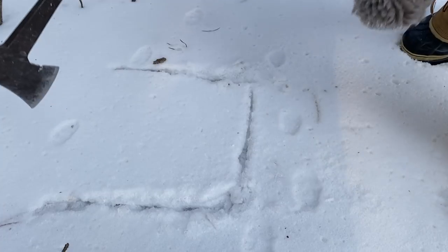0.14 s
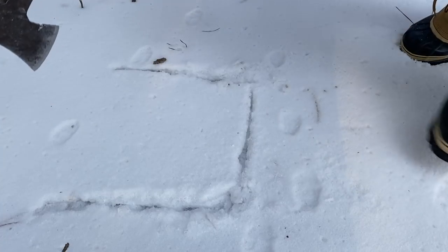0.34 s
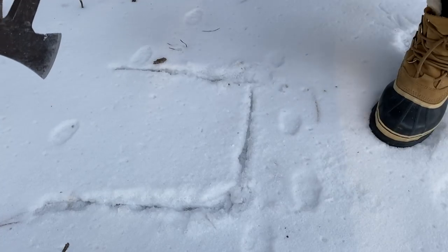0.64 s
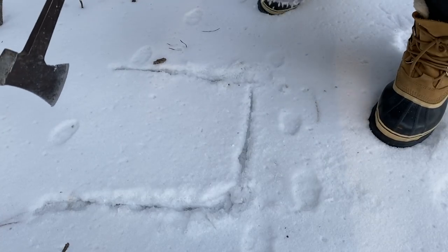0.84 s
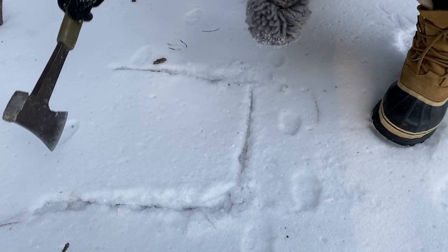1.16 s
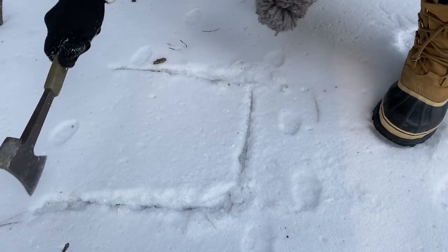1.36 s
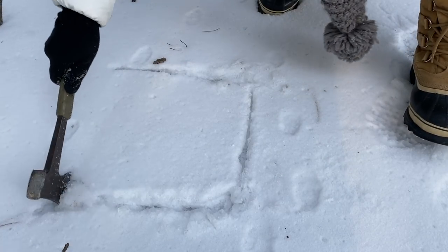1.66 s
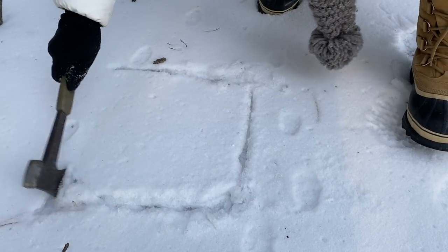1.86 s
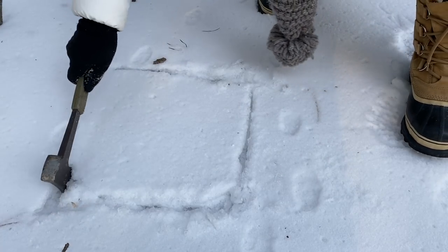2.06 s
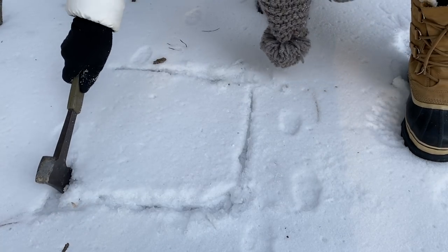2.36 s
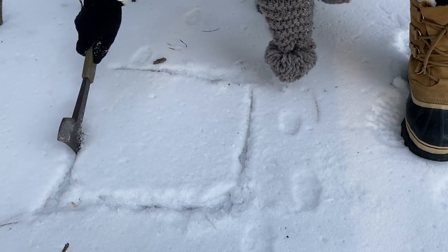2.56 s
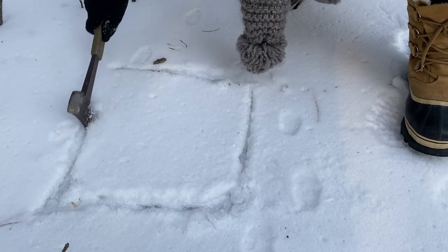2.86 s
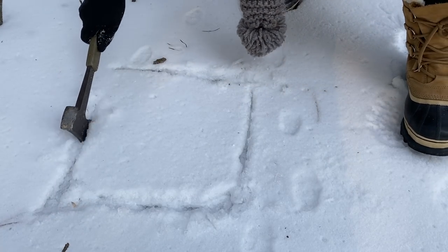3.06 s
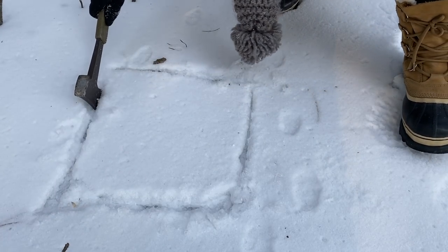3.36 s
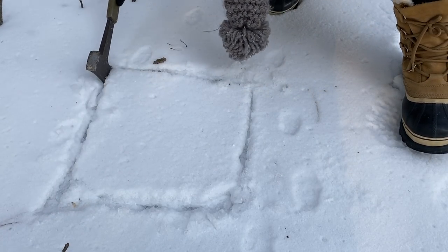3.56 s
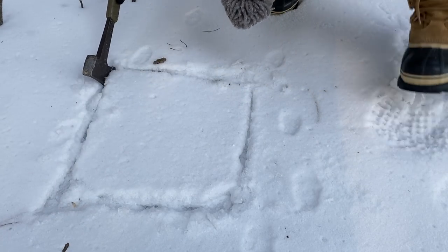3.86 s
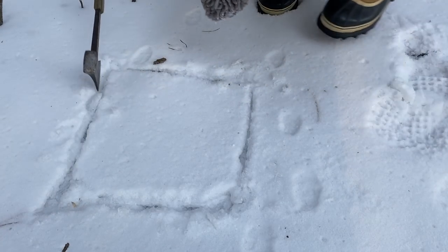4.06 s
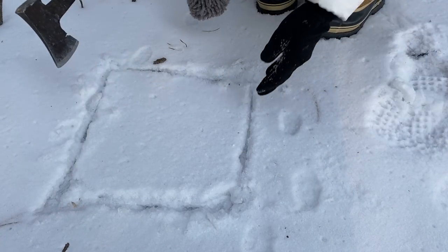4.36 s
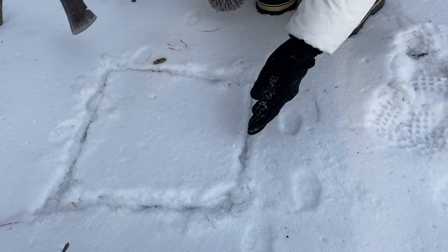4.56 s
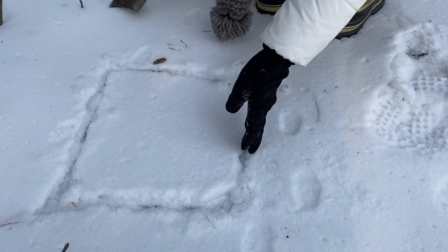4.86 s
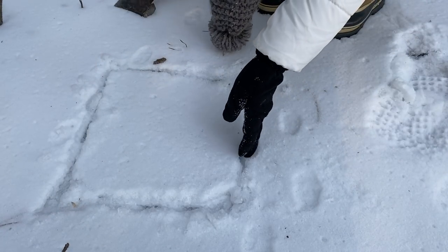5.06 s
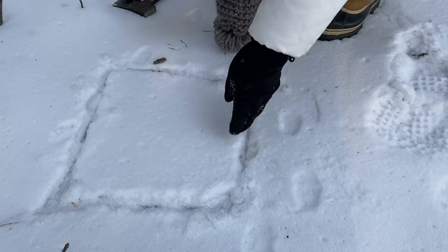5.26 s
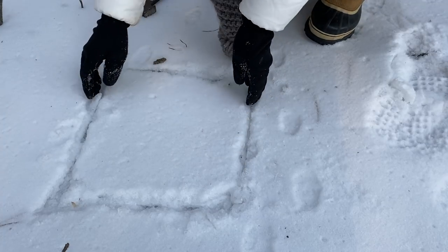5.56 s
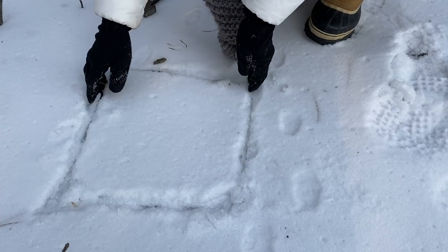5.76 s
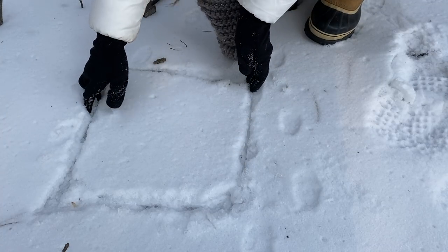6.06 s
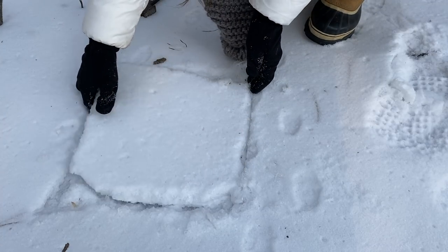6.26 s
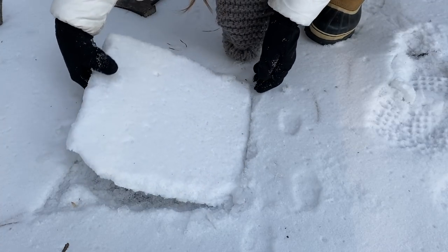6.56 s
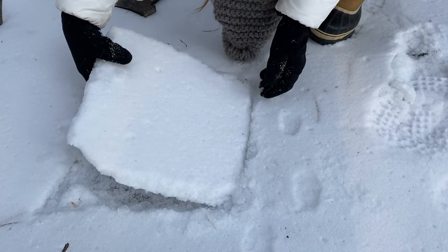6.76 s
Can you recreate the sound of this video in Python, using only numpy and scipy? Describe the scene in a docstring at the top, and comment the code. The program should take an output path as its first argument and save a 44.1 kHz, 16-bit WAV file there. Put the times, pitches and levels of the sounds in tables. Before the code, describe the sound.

A hatchet chops and saws through crusted snow with grainy crunches, sharp cracks and brief steel rings, then gloved hands slide a slab loose.

```python
"""A hatchet chops and saws crusted snow close by: ice grains crunch as dense, clustered noise clicks.
The stiff crust cracks under blade and boots: noise snaps with short, falling thumps.
Jacket cloth rubs as soft noise swells; ice rasps on the steel head and rings its damped modes.
Gloved hands prise the slab loose and slide it up, a run of grainy swells.
The still winter forest adds a faint rumble and hiss, and its trunks a very faint, dull tail."""
import sys
import numpy as np
from scipy import signal
from scipy.fft import rfft, irfft, next_fast_len
from scipy.io import wavfile
from scipy.ndimage import uniform_filter1d

SR = 44100
rng = np.random.default_rng(int(sys.argv[2]) if len(sys.argv) > 2 else 0)


def store_pcm(level_fs):
    """Save levels as 16-bit WAV."""
    pcm = np.round(np.clip(level_fs, -1, 1) * 32767).astype(np.int16)
    wavfile.write(sys.argv[1], SR, np.atleast_2d(pcm).T)


N = 305171
SIZE = next_fast_len(N + 8192)  # transform length, with room for tails
HZ = np.fft.rfftfreq(SIZE, 1 / SR)
TIME = np.arange(N) / SR


def gain_of(db):
    """Decibels to amplitude."""
    return 10 ** (np.asarray(db) / 20)


def evened(x):
    """Scales to rms 1."""
    return x / np.sqrt(np.mean(abs(x) ** 2) + 1e-20)


def blow(x):
    """Scales a short sound to the energy of 10 ms at rms 1."""
    return x * np.sqrt(SR / 100 / np.sum(x ** 2))


def read(points, hz):
    """Reads a table on a log-frequency axis."""
    f, value = np.transpose(points)
    return np.interp(np.log(hz + 1), np.log(f), value)


def add(mix, s, sound):
    """Adds a sound to the mix at time s."""
    part = mix[..., max(round(s * SR), 0):][..., :sound.shape[-1]]
    part += sound[..., :part.shape[-1]]


def filtered(x, response):
    """Applies a frequency response."""
    return irfft(rfft(x, SIZE) * response, SIZE)[..., :N]


def colour(points):
    """Causal (minimum-phase) response of unit power with the given spectrum."""
    cepstrum = irfft(np.log(evened(gain_of(read(points, HZ)))), SIZE)
    cepstrum[1:SIZE // 2] *= 2
    cepstrum[SIZE // 2 + 1:] = 0
    return np.exp(rfft(cepstrum))


def bending(hz, travel_ms):
    """Bending waves in a plate: delay goes as 1 / sqrt(Hz), travel_ms at 250 Hz, so the bass comes last."""
    return np.exp(-4j * np.pi * travel_ms / 1000 * np.sqrt(250 * hz))


# scatter of grains between left and right: (frequency [Hz], side level [dB])
SIDE_SCATTER = [(60, -8), (150, -11.5), (280, -8), (600, -3), (1500, -10.5), (3000, -13.5), (6000, -4.5),
                (9000, -20), (16000, -6)]


def scattered(clicks):
    """Gives each click its own place between left and right."""
    side = filtered(clicks * rng.standard_normal(N), gain_of(read(SIDE_SCATTER, HZ)))
    return np.array([clicks + side, clicks - side])


def grains(per_s, spread_db):
    """Ice grains breaking: many small clicks and a few large ones."""
    size = gain_of(spread_db * np.minimum(rng.exponential(1, N), 4))
    sign = rng.choice([-1., 1.], N)
    breaks = rng.random(N) < per_s / SR
    return evened(size * sign * breaks)


def clumps(depth_db, width_s):
    """Grains give way in clusters, as in stick and slip: a random level drawn every width_s."""
    knots = np.arange(0, 8, width_s)
    wander = np.interp(TIME, knots, rng.standard_normal(len(knots)))
    return evened(gain_of(depth_db * wander))


def steadied(clicks, order=900):
    """Evens out the clicks by their local power: close to a large break the others are small."""
    return clicks / np.sqrt(abs(uniform_filter1d(clicks ** 2, order)) + 0.0085)


def to_left(x, lead_s, tilt_db):
    """The hatchet works on the left: its sound comes there first and stronger."""
    lag = np.exp(2j * np.pi * HZ * np.array([[0], [-lead_s]]))
    return filtered(x, lag) * gain_of([[tilt_db], [-tilt_db]])


def plates(slips, low_hz=230, high_hz=720, octaves=0.36, count=9):
    """Each slip sets off one patch of crust, which chirps at its own pitch."""
    patch = rng.integers(0, count, N)
    spectrum = 0
    for k, hz in enumerate(np.geomspace(low_hz, high_hz, count)):
        hump = evened(np.exp(-(np.log2((HZ + 1) / hz) / octaves) ** 2))
        spectrum = spectrum + rfft(slips * (patch == k), SIZE) * hump
    return irfft(spectrum * bending(HZ, travel_ms=7.077), SIZE)[:, :N]


def swells(rows, late):
    """Level of slow movements: each rises and falls in one arch; late > 1 delays its top, < 1 hastens it."""
    level = np.zeros(N)
    for s, length, level_db in rows:
        progress = np.arange(0, length, 1 / SR) / length
        add(level, s, gain_of(level_db) * np.sin(np.pi * progress ** late))
    return level


# chops, pushes of the blade and scuffs:
# (time [s], push length [s], relative crust level [dB], fizz over crust [dB])
STROKE_HITS = [(0.079, 0.0064, -39, 5), (.15, 0.064, -50, 7.5), (0.374, 0.048, -25.5, -1),
               (.57, 0.011, -50.5, 14.5), (0.74, 0.018, -34, -1), (0.749, 0.037, -17, -12.5),
               (0.796, .03, -29, -8.5), (0.867, 0.0071, -33.5, -3), (0.882, 0.021, -26, -10),
               (1.031, 0.0072, -38, -2), (1.45, 0.059, -33, -16), (1.52, .034, -26, 0.5),
               (1.816, 0.018, -24, 2.5), (1.89, 0.063, -43, -6), (2.093, 0.11, -32, -4),
               (2.423, 0.089, -30.5, -1), (2.722, 0.13, -31, 2.5), (2.939, 0.04, -50.5, -45),
               (3.112, 0.081, -30, 4.5), (3.396, 0.079, -39, 3), (3.479, 0.046, -31, -10.5),
               (3.733, 0.06, -37.5, -7), (3.876, 0.014, -31.5, -13), (3.93, 0.089, -49.5, 3),
               (4.078, 0.1, -32, -0.5), (4.258, 0.067, -33, -5), (4.318, 0.02, -30, -3),
               (4.41, .045, -38, -5), (4.487, 0.05, -39.5, -8.5), (4.849, 0.048, -37.5, -26),
               (5.118, 0.022, -28.5, -26), (5.209, .045, -36.5, -9), (5.3, 0.12, -50, 7)]
# light rubbing of the snow under boots and blade:
# (time [s], relative crust level [dB], relative fizz level [dB])
RUBBING = [(0.0, -42.5, -42.5), (0.23, -49, -73), (0.38, -64.5, -64), (1.2, -38, -54.5), (1.39, -36.5, -41),
           (1.69, -46.5, -61), (2.08, -34, -47), (2.22, -47.5, -49.5), (2.49, -49, -54), (3.02, -47, -45.5),
           (3.27, -42.5, -55), (3.74, -48.5, -56.5), (3.93, -38.5, -50), (4.18, -39, -44.5),
           (4.4, -49.5, -66.5), (4.7, -63.5, -69), (5.26, -35, -47), (5.62, -57.5, -61)]
# a long push is leaned into slowly and dies slowly; a short chop bites at once
BITE_S, LEAN_S = 0.0027, 0.53  # rise: BITE_S + length squared / LEAN_S
FALL_S, FALL_SHARE = .028, .25  # 20 dB fall, before linger scales it: fixed part and share of the length
CRUMBS_DB, CRUMBS_FALL_S = -22.5, 0.45  # loosened crumbs settle; their 20 dB fall is scaled likewise


def pressure(column, lag_s, stretch, linger, lumps, creep_db):
    """Amplitude of the crunch in the crust (column 0) or the fizz (column 1): strokes over fitful rubbing."""
    rubbing = np.transpose(RUBBING)
    rubbing_db = creep_db + np.interp(TIME, rubbing[0], rubbing[1 + column])
    power = (lumps * gain_of(rubbing_db)) ** 2
    t = np.arange(SR) / SR
    for s, length, level_db, bright_db in STROKE_HITS:
        rise = np.minimum(t / (BITE_S + length ** 2 / LEAN_S), 1)
        after = np.maximum(t - stretch * length, 0) / linger
        fall = gain_of(-20 * after / (FALL_S + FALL_SHARE * length))
        crumbs = gain_of(CRUMBS_DB - 20 * after / CRUMBS_FALL_S)
        stroke = gain_of(level_db + column * bright_db) * rise * (fall + crumbs)
        add(power, s + lag_s, stroke ** 2)
    return np.sqrt(power)


# how much the blade's coarse grinding colours the crunch: (time [s], share [0-1])
GRIND_SHARE = [(1.5, 0.1), (1.52, 0.45), (3.55, 0.78), (3.7, 0.56), (4.34, .4), (4.4, 0.48)]
# loose powder under the boots sparkles: (time [s], share of the fizz [0-1])
POWDER_SHARE = [(.7, 0.6), (.76, 0.36), (1.9, 0.47), (2.4, 0.32)]
# tones of drumming crust, mid grit, airy fizz, sparkling powder and crust ground by the blade:
# each (frequency [Hz], relative level per Hz [dB])
CRUST_TONE = [(25, -29), (55, 3), (130, 3), (260, 2), (420, -5), (650, -2.5), (1100, -21.5), (2200, -49.5)]
GRIT_TONE = [(500, -15), (950, 6.5), (1300, 1), (1800, 0), (2700, -0.5), (3300, -4.5), (4200, -1.5),
             (6500, -40)]
FIZZ_TONE = [(2200, -26.5), (4200, -3), (5800, 0.5), (7100, 6), (8200, 1.5), (10500, 2), (13000, -12),
             (16000, -14.5)]
SPARKLE_TONE = [(3000, -27.5), (8000, -1), (11500, 5.5), (16000, -11)]
GRIND_TONE = [(180, -25.5), (420, 8.5), (650, 1.5), (950, 4), (1300, -1.5), (1900, -6.5), (2700, -3),
              (4200, -14), (6500, -24.5)]
BLADE_LEAD_S = .00012  # the grinding reaches the left this much earlier


def crunch(crust_db=-5, plates_db=-2, grit_db=-6.0, fizz_db=-1.88, grind_db=-5, cut_db=-4, squeak_db=-3):
    """Fine grains fizz and drum on the crust; larger slips chirp through it; the blade grinds coarse grit."""
    fine_grains = evened(grains(per_s=6000, spread_db=3.0) * clumps(depth_db=3.5, width_s=0.0037))
    clicks = scattered(steadied(fine_grains))
    slips = scattered(steadied(grains(per_s=330, spread_db=1)))
    coarse = scattered(steadied(grains(per_s=800, spread_db=5.0)))

    lumps = clumps(depth_db=7.5, width_s=0.0099)
    low = pressure(column=0, lag_s=0.00033, stretch=0.99, linger=0.36, lumps=lumps ** 0.78, creep_db=-0.5)
    high = pressure(column=1, lag_s=0, stretch=0.85, linger=0.53, lumps=lumps ** 0.51, creep_db=2)
    between = np.sqrt(low * high)
    powder = np.interp(TIME, *np.transpose(POWDER_SHARE))
    grind = np.interp(TIME, *np.transpose(GRIND_SHARE))

    drumming = filtered(clicks * low, colour(CRUST_TONE) * bending(HZ, travel_ms=5.86))
    crust = gain_of(crust_db) * drumming + gain_of(plates_db) * plates(slips * low)
    crust *= gain_of(cut_db * grind)  # a thin edge shakes the crust less than a boot
    grit = gain_of(grit_db) * filtered((0.83 * clicks + .5 * slips) * between, colour(GRIT_TONE))

    grinding = gain_of(grind_db) * filtered(coarse * between * grind, colour(GRIND_TONE))
    catches = scattered(steadied(grains(per_s=260, spread_db=3)))  # the edge catches, chips of crust squeak
    squeaks = plates(catches * low * grind, low_hz=369, high_hz=1250, octaves=.16, count=8)
    grinding += gain_of(squeak_db) * squeaks

    fine = gain_of(fizz_db) * (clicks + 0.64 * slips) * high
    fizz = filtered(fine * (1 - powder), colour(FIZZ_TONE)) + filtered(fine * powder, colour(SPARKLE_TONE))
    return crust + grit + fizz + to_left(grinding, lead_s=BLADE_LEAD_S, tilt_db=0.5)


# tone of the still air: (frequency [Hz], relative level per Hz [dB])
FOREST_TONE = [(20, -24), (47, -1.5), (80, -0.5), (150, -7), (300, -32.5), (900, -36), (2000, -22),
               (7000, -48), (16000, -59)]


def forest(air_db=-59):
    """Still air: a faint rumble and hiss, from steady coloured noise."""
    return gain_of(air_db) * filtered(scattered(rng.standard_normal(N)), colour(FOREST_TONE))


def trees(x, wet_db=-31, t60=0.17):
    """Trunks throw back a very faint, dull tail: decaying noise that starts 12 ms late."""
    t = np.arange(SR // 2) / SR
    tail = rng.standard_normal((2, len(t))) * gain_of(-60 * t / t60) * (t > .012)
    tail = signal.lfilter([1], [1, -.6], tail)  # dulls the treble
    return gain_of(wet_db) * filtered(x, rfft(tail / np.linalg.norm(tail[0]), SIZE))


def small_cracks(count=18, over_db=3, spread_db=6, snap_db=-7, low_hz=170, high_hz=600):
    """Random cracks whose level follows the rubbing that sets them off; rows as in TIMED_CRACKS."""
    when, size, pitch = rng.random((count, 3)).T
    times, crust_db, _ = np.transpose(RUBBING)
    s = (np.arange(count) + when) / count * times[-1]  # one in each equal slice of time
    level = np.interp(s, times, crust_db) + over_db + spread_db * (size - .5)
    return list(zip(s, level, level + snap_db, low_hz * (high_hz / low_hz) ** pitch))


# single timed cracks of the crust, from heavy thumps to small ticks:
# (time [s], relative thump level [dB], relative snap level [dB], thump centre [Hz])
TIMED_CRACKS = [(0.0332, -42, -41.5, 440), (0.064, -39.5, -36, 350), (0.1514, -53, -36, 270),
                (0.1687, -32, -32.5, 300), (0.6105, -29, -28.5, 213.1), (0.753, -28, -50, 420),
                (.7614, -15, -20.5, 649), (.7703, -17.5, -23.5, 605), (0.7726, -23.5, -28, 215),
                (0.822, -25.5, -33.5, 217), (0.8863, -29.5, -28.5, 175), (0.8958, -31, -46, 173),
                (1.189, -25, -27.5, 234), (1.2344, -23.5, -54, 326), (1.281, -27, -37.5, 238),
                (1.3242, -25, -37, 268), (1.454, -31, -32.5, 170), (1.5288, -20.5, -29, 184),
                (1.5467, -30, -36, 130), (1.646, -32, -34.5, 274), (1.852, -34.5, -51, 130),
                (2.029, -39, -43, 128), (2.2375, -38, -39, 350), (2.433, -34, -39, 440),
                (3.1285, -48, -24.5, 560), (3.2949, -38.5, -43, 129), (3.354, -35, -62, 338),
                (3.4134, -34.5, -33.5, 280), (3.4546, -33, -29, 566), (3.499, -35, -43, 278),
                (3.7712, -34.5, -54, 285), (3.8624, -24, -29.5, 288), (3.9018, -33.5, -44, 277),
                (3.9887, -29, -36, 259.3), (4.0427, -36, -41.5, 280), (4.1236, -30, -31, 170),
                (4.1393, -26, -55, 228), (4.2236, -38.5, -32.5, 220), (4.293, -32.5, -44, 302.4),
                (4.49, -40, -39, 220), (4.6206, -34, -33.5, 220), (4.6762, -57, -45, 683),
                (4.9817, -34, -39.5, 400), (5.1042, -16.5, -38, 220), (5.1056, -23.5, -31, 620),
                (5.2018, -23, -34.5, 207), (5.4773, -62, -42, 700), (5.5066, -43, -41, 424)]
# tone of snapping ice: (frequency [Hz], relative level per Hz [dB])
SNAP_TONE = [(300, 8.5), (800, 9), (2600, -2.5), (4000, -2), (7000, 2), (11000, -4.5), (16000, -10.5)]


def cracks(snap_s=0.0044, snap_db=-1.0, thump_db=2, octaves=1.065, skirt=0.073, skirt_hz=2600,
           echo_db=-10, echo_s=0.0061, travel_ms=7):
    """Each crack snaps; its bending wave arrives as a falling chirp and scatters through the crust."""
    hz, t = np.fft.rfftfreq(4096, 1 / SR), np.arange(4096) / SR
    snaps, thumps, echoes = np.zeros(N), np.zeros(N), np.zeros((2, N))
    for s, low_db, sharp_db, centre_hz in TIMED_CRACKS + small_cracks():
        tear, *scatter = rng.standard_normal((4, len(t)))
        snap = blow(tear * abs(tear) * np.exp(-t / snap_s))
        add(snaps, s + .0006, gain_of(sharp_db) * snap)

        hump = np.exp(-(np.log2((hz + 1) / centre_hz) / octaves) ** 2)
        hump /= np.sqrt(1 + (hz / 900) ** 10)
        head = skirt * hz / (hz + centre_hz) * np.exp(-hz / skirt_hz)  # the fast, thin start of the chirp
        band = (hump + head) * bending(hz, travel_ms)
        add(thumps, s, gain_of(low_db) * blow(irfft(band)[:len(t) // 2]))

        # scattered paths: one part shared by left and right, one part their own
        paths = (scatter[0] + np.array(scatter[1:])) * t * np.exp(-t / echo_s)
        add(echoes, s, gain_of(low_db) * np.sqrt(2) * blow(irfft(rfft(paths) * band)))
    sharp = gain_of(snap_db) * filtered(scattered(snaps), colour(SNAP_TONE))
    return sharp + gain_of(thump_db) * thumps + gain_of(echo_db) * echoes


# the arms reach out: (time [s], length [s], relative level [dB])
REACHES = [(1.055, 0.83, -42), (5.08, 0.65, -48.5)]
# tone of rubbing cloth: (frequency [Hz], relative level per Hz [dB])
CLOTH_TONE = [(200, -12), (700, 6.5), (1300, 3), (2500, -2.5), (5000, -5.5), (9000, -15), (16000, -30)]


def sleeves():
    """Jacket cloth slides over itself as the arms reach: lumpy noise in slow swells."""
    rub = rng.standard_normal(N) * clumps(depth_db=5, width_s=0.0034)
    return filtered(scattered(swells(REACHES, late=0.65) * rub), colour(CLOTH_TONE))


# blows on the hatchet head:
# (time [s], relative ring level [dB], relative rasp level [dB], contact decay [s], damping by snow [1/s])
HEAD_BLOWS = [(1.523, -16.5, -19, 0.0042, 115), (1.546, -48, -47, 0.003, 110),
              (1.817, -27, -25.5, 0.0097, 73), (1.852, -34, -44, 0.0015, 130),
              (4.8289, -39, -34, 0.0034, 1), (4.853, -46, -47, .004, 1), (4.888, -39.5, -35, 0.0052, 1),
              (4.984, -46, -58, 0.0045, 17), (5.105, -39, -45, 0.0057, 70)]
# modes of the hatchet: (frequency [Hz], relative level [dB], 60 dB decay before damping by snow [s])
STEEL_MODES = [(2220, -1.5, 0.025), (2347, -12, 0.42), (2830, 6.5, 0.039), (3830, -3, 0.03),
               (4010, -12.5, 0.034), (6700, -4, 0.032), (7260, -1.5, 0.28)]


def hatchet(left_db=2):
    """Ice rasps against the steel head and rings its modes; snow round the head damps the ring."""
    t = np.arange(SR // 2) / SR
    rings, rasps = np.zeros((2, N)), np.zeros(N)
    for s, ring_db, rasp_db, contact, damping in HEAD_BLOWS:
        rattle = rng.standard_normal(len(t)) * np.exp(-t / contact)
        modes = np.zeros(len(t))
        for hz, level_db, t60 in STEEL_MODES:
            decay = gain_of(level_db - 60 * t / t60)
            modes += decay * np.sin(2 * np.pi * (hz * t + rng.random()))
        modes *= np.exp(-damping * t)
        rattled = signal.fftconvolve(rattle, modes)[:len(t)]
        ring = blow(blow(modes) + .5 * blow(rattled))
        # the cut lies to the left; the lead grows with the share of grinding
        lead = BLADE_LEAD_S * np.interp(s, *np.transpose(GRIND_SHARE))
        add(rings[0], s, gain_of(ring_db + left_db) * ring)
        add(rings[1], s + lead, gain_of(ring_db - left_db) * ring)
        add(rasps, s, gain_of(rasp_db) * blow(rattle))
    return rings + filtered(scattered(rasps), colour(SNAP_TONE))


# the gloves prise the slab loose and slide it up: (time [s], length [s], relative level [dB])
SLAB_SLIDES = [(5.63, 0.13, -51), (5.76, 0.29, -49.5), (6.0, 0.33, -45.5), (6.27, 0.32, -49),
               (6.49, 0.27, -50), (6.73, 0.53, -51)]
# tone of the sliding slab: (frequency [Hz], relative level per Hz [dB])
SLAB_TONE = [(60, -10), (200, 2.5), (350, 5), (600, 4), (1200, -6), (2500, -6.5), (4500, -5), (7000, 1),
             (11000, -2), (16000, -16)]


def slab(crackle_db=-11):
    """The slab slides on loose, fine grains; now and then a larger one snaps."""
    level = swells(SLAB_SLIDES, late=0.71) * clumps(depth_db=2.3, width_s=.03)
    fine = steadied(grains(per_s=7000, spread_db=1.5) * clumps(depth_db=4.5, width_s=0.0046))
    snaps = grains(per_s=47, spread_db=4)
    sliding = filtered(scattered(level * fine), colour(SLAB_TONE))
    return sliding + gain_of(crackle_db) * filtered(scattered(level * snaps), colour(SNAP_TONE))


def scene():
    """All the work on the snow, and the forest round it."""
    near = crunch() + cracks() + sleeves() + hatchet() + slab()
    return near + trees(near) + forest()


# phase between the two microphone ports: (frequency [Hz], left lead [turns])
LEFT_LEAD = [(0, 0), (1100, 0), (2700, .2), (3600, 0), (7350, 0), (9050, .5), (11200, 1), (13250, 1.5),
             (15000, 2)]
# level between the ports: (frequency [Hz], left over right [dB])
LEFT_TILT = [(100, 1), (450, 3), (850, 2), (1700, 2.5), (2800, 5), (3700, 3), (5800, 2.5), (7200, 0.5),
             (9000, 0)]


def record(dry, low_cut_hz=36, ceiling=1.0, edge_hz=16100):
    """Two ports differ in level and phase; a low cut, a soft ceiling, then the band limit."""
    tilt = gain_of(read(LEFT_TILT, HZ))
    lag = np.exp(-2j * np.pi * np.interp(HZ, *np.transpose(LEFT_LEAD)))
    ports = np.array([tilt, lag]) * np.sqrt(2 / (1 + tilt ** 2))  # keeps the summed power of the two
    pair = filtered(dry, ports)
    low_cut = signal.butter(2, low_cut_hz, "high", fs=SR, output="sos")
    pair = signal.sosfilt(low_cut, pair)
    pair = pair / (1 + (pair / ceiling) ** 4) ** .25
    band_limit = signal.firwin(255, edge_hz, window=("kaiser", 9), fs=SR)
    return signal.oaconvolve(pair, band_limit[None], "same", axes=1)


dry = scene()
out = record(dry)
store_pcm(out)
```